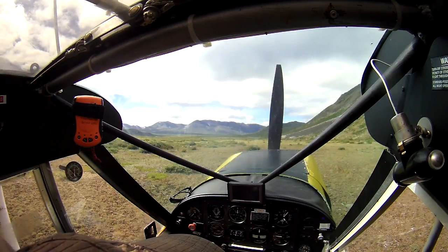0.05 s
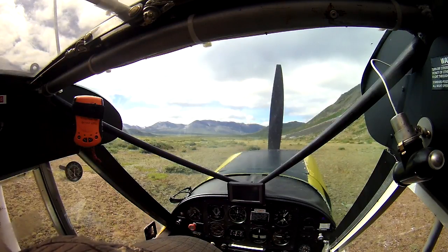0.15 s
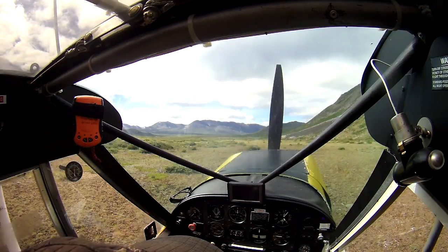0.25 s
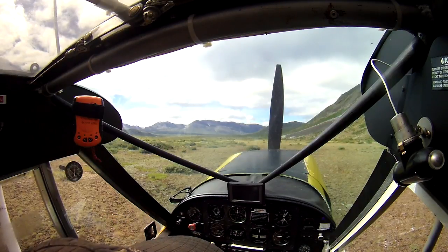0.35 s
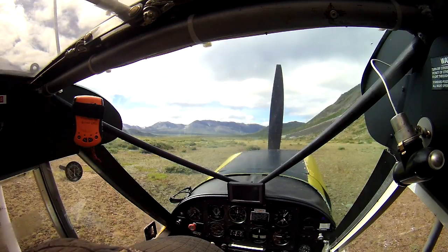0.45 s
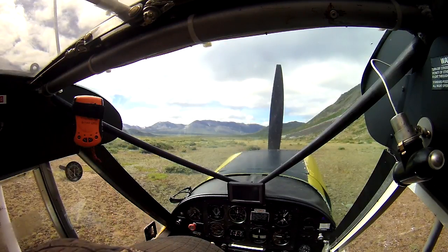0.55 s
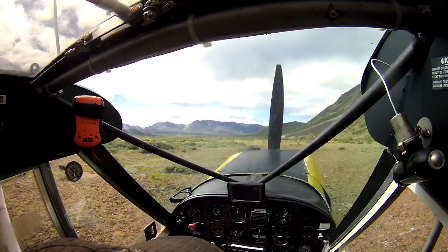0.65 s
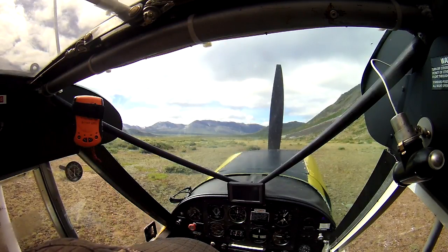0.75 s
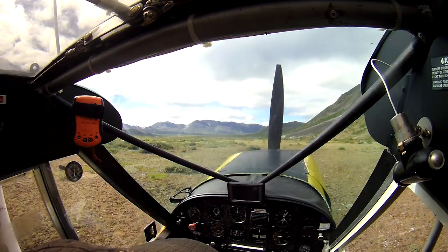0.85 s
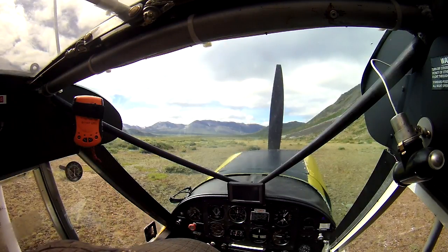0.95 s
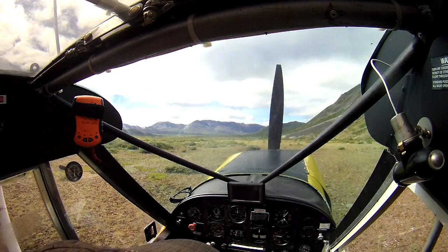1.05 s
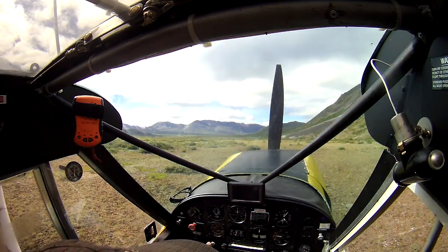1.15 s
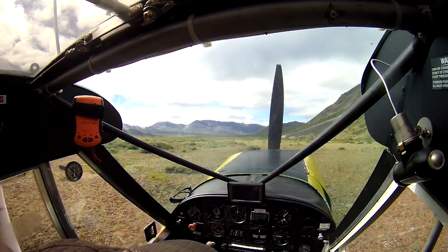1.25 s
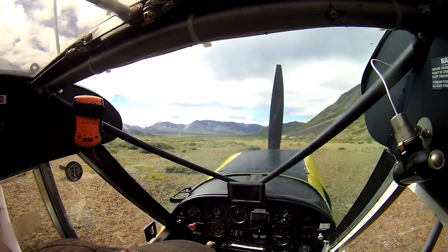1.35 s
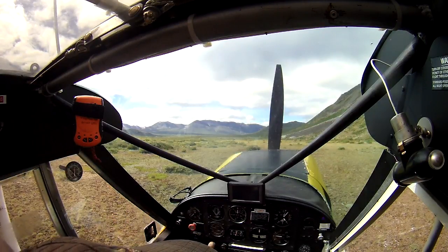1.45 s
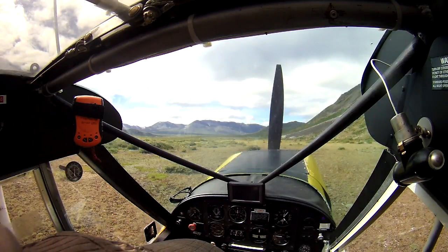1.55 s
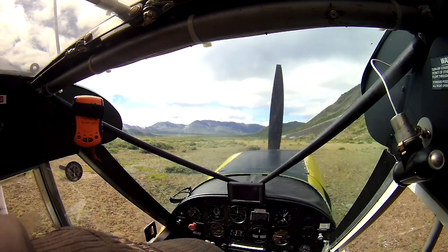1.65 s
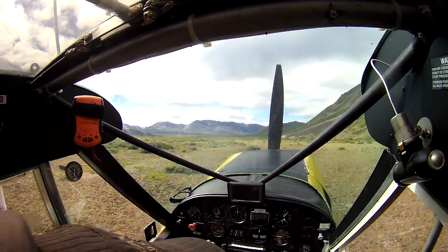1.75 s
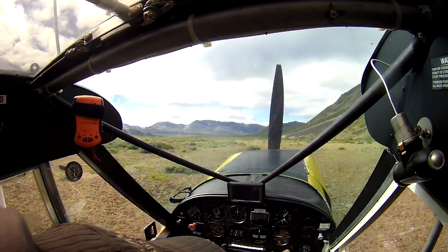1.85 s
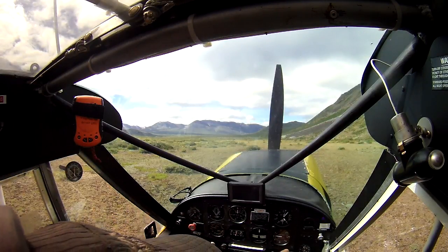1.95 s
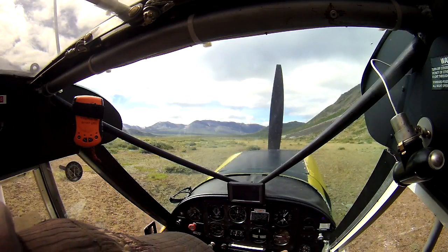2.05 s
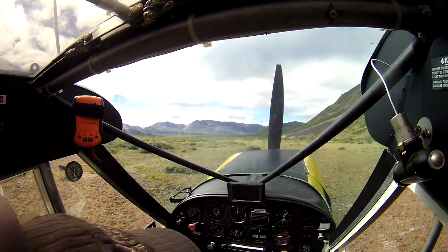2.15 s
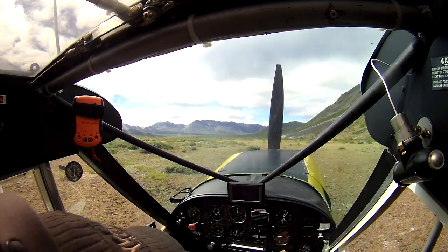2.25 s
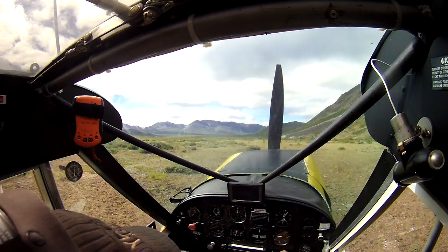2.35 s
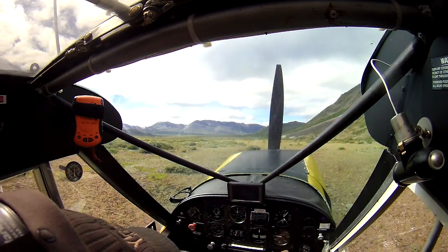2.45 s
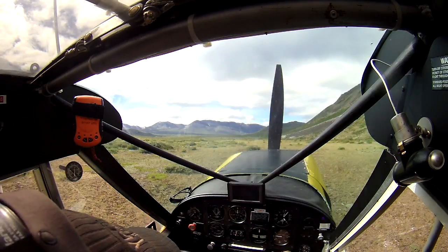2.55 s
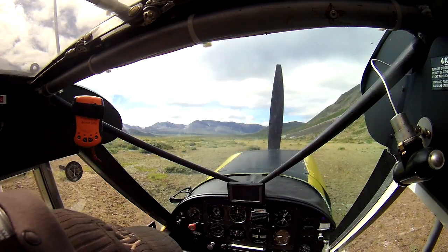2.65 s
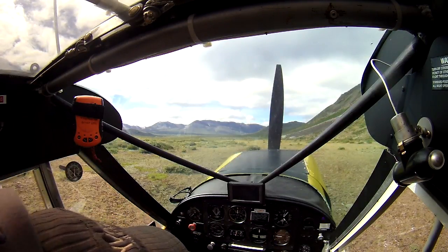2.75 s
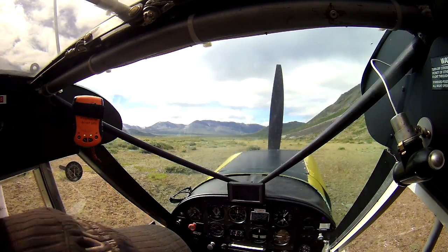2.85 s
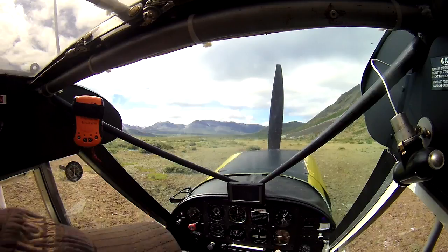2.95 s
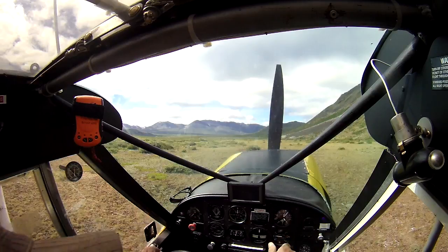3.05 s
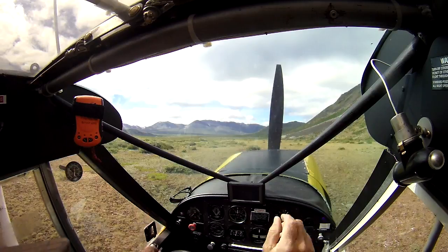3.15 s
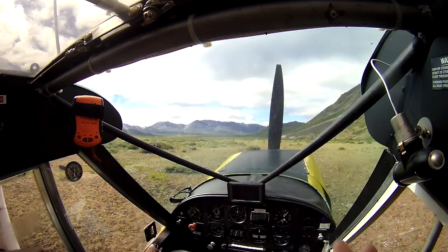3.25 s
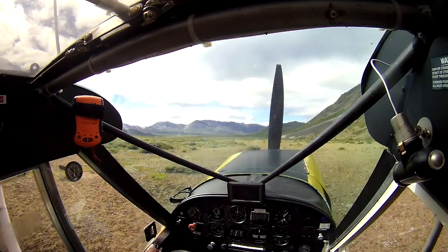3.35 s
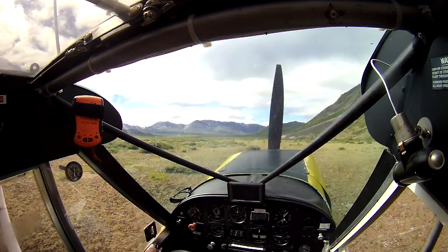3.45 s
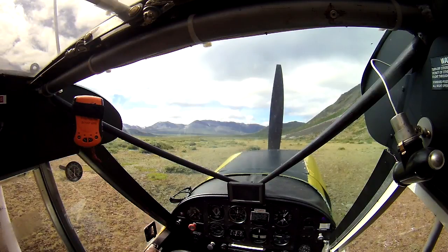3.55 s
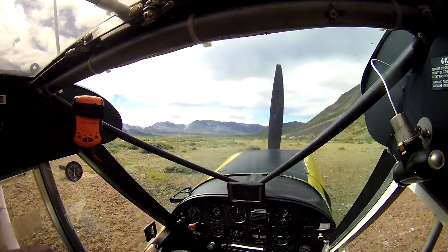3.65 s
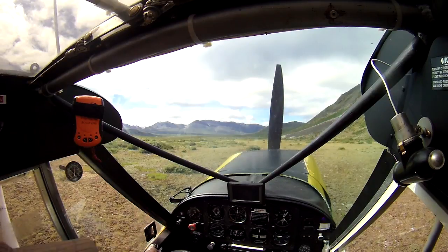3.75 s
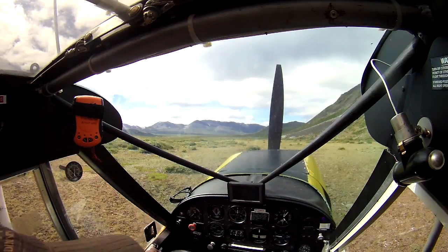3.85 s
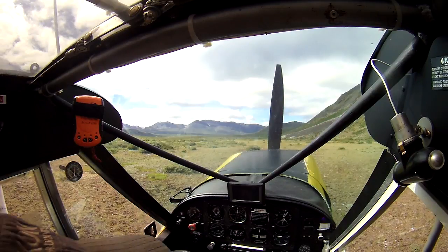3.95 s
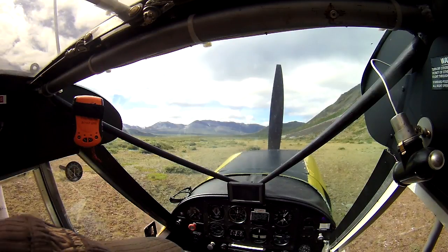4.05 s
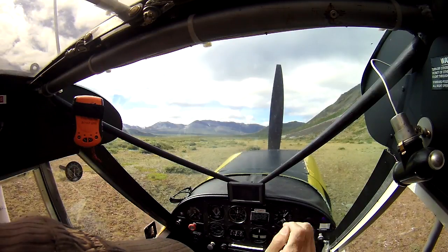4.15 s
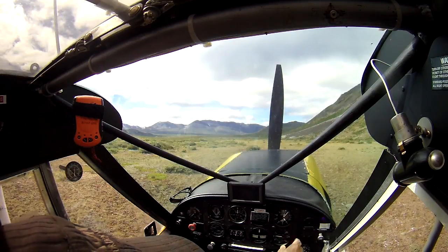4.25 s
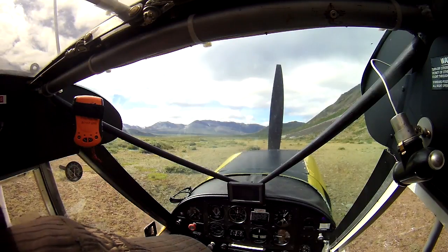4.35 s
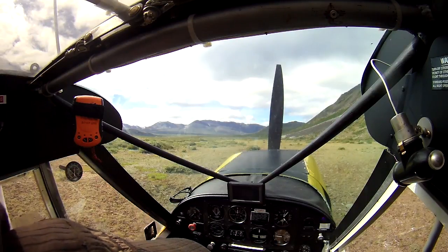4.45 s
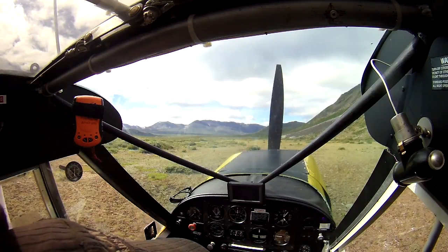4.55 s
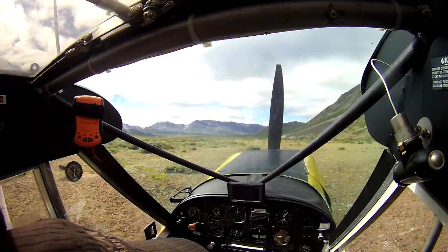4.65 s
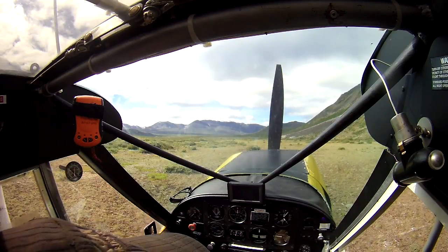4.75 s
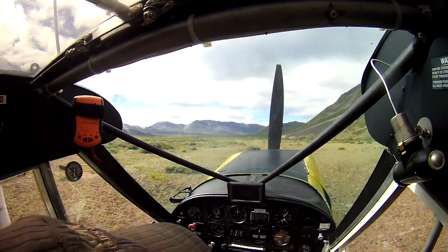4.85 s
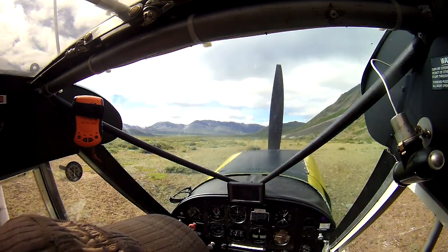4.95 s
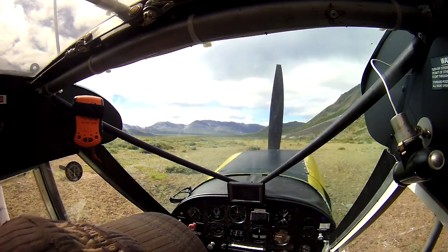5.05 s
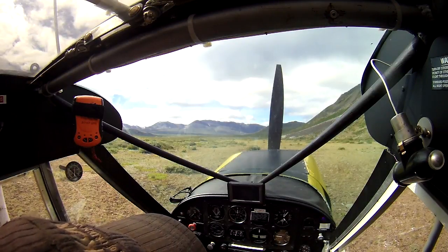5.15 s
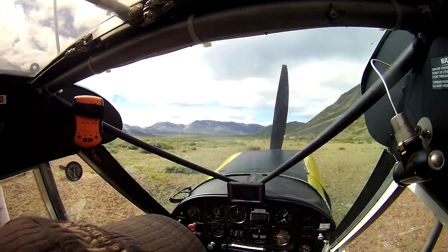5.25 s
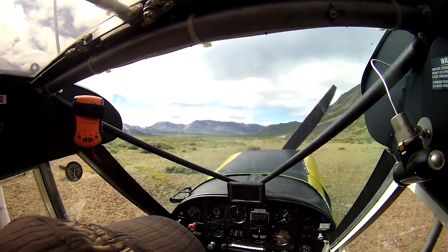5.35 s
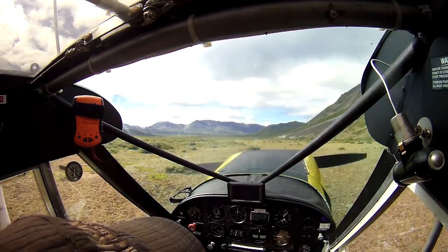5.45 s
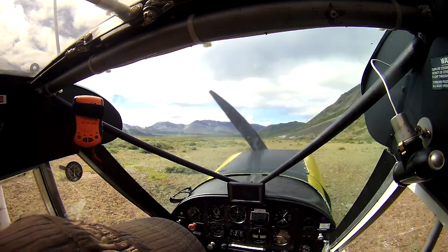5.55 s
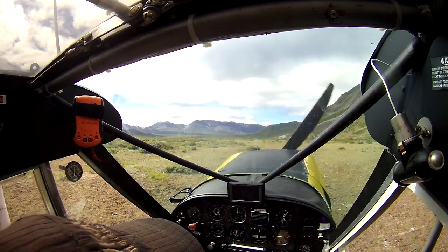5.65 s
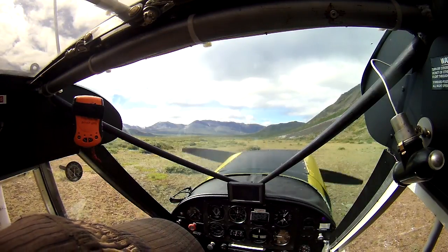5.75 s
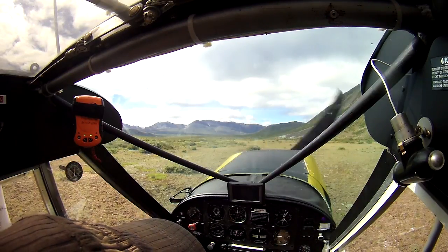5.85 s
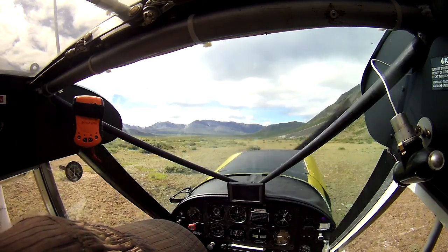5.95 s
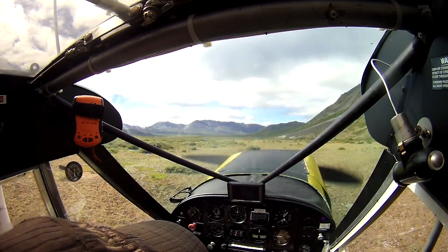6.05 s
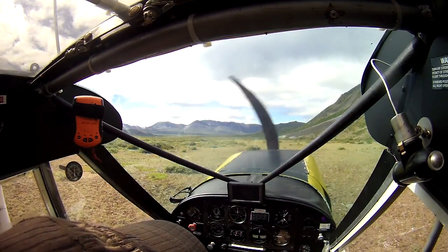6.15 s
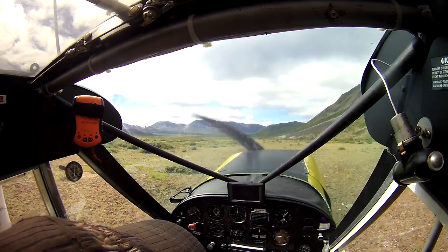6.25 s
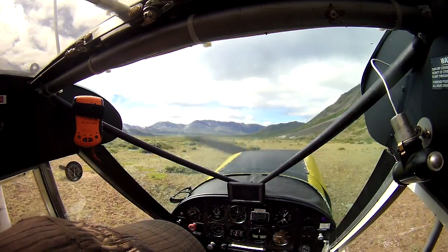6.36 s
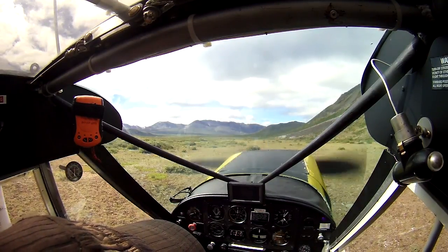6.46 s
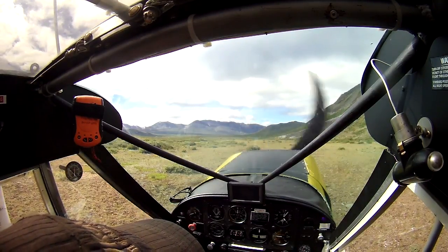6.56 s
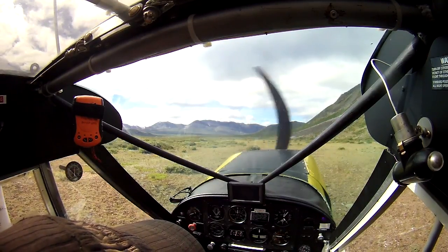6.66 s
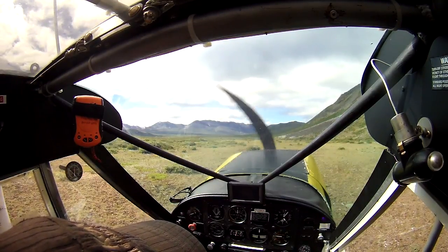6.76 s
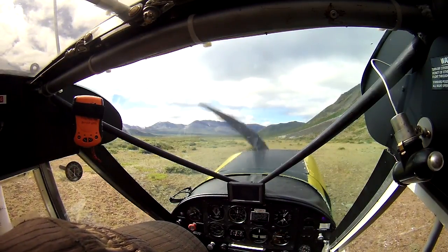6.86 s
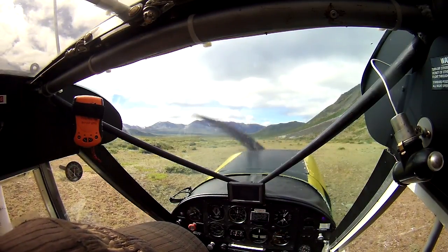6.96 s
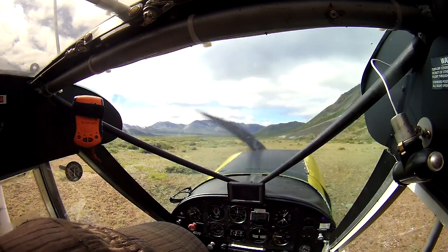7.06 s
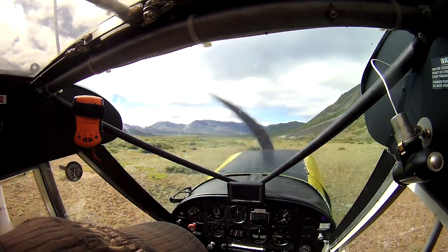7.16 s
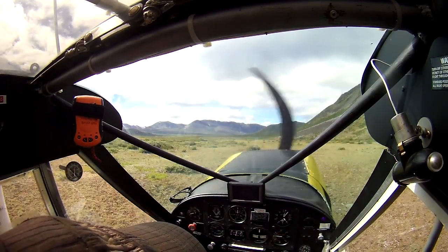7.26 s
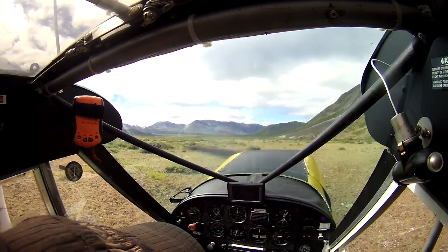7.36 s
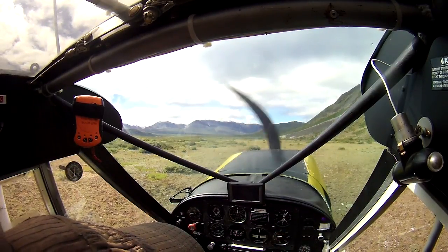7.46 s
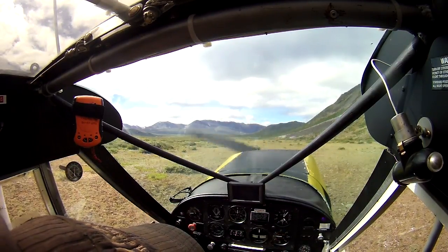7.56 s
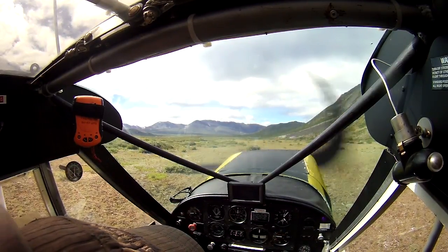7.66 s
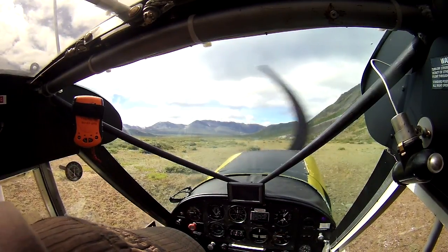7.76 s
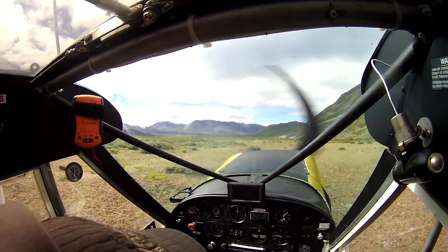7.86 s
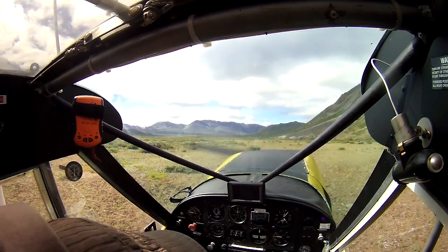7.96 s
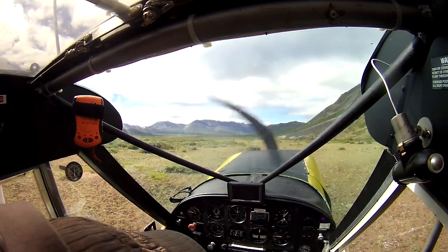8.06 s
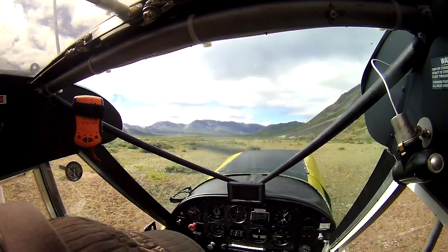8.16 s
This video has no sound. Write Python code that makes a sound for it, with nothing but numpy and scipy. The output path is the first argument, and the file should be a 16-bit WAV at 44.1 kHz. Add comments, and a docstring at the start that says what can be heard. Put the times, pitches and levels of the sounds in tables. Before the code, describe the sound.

Heard from between the seats of a small propeller plane, a quiet stretch holds faint breeze rumble, sliding cloth and scattered switch clicks. A firm click engages the starter, which grinds and whines for about half a second. The piston engine fires with hard gear knocks and a deep shudder, rattles unevenly at idle and then gains speed, ending with a short burst of exhaust cracks.

```python
"""In the cockpit of a parked light aircraft, a sleeve rustles and panel switches click over a faint
outdoor rumble. At 5.2 s the starter clunks in and whirrs, and the propeller gear knocks through its
slack. Near 5.8 s the four-cylinder engine catches, shakes the cabin and clatters at a lumpy idle.
From 7 s it picks up speed, with a short burst of sharp exhaust cracks just before the end."""
import sys
import numpy as np
from scipy import signal
from scipy.fft import rfft, irfft
from scipy.io import wavfile
from scipy.ndimage import uniform_filter1d

SR = 44100
rng = np.random.default_rng(int(sys.argv[2]) if len(sys.argv) > 2 else 0)


def int16_out(signal):
    """Quantize to a 16-bit WAV file."""
    q = np.round(np.clip(np.atleast_2d(signal).T, -1, 1) * 32767)
    wavfile.write(sys.argv[1], SR, q.astype(np.int16))


N = 361619
T = np.arange(N) / SR
STARTER_ON_S, KICK_S, RELEASE_S = 5.2, 5.25, 5.8  # the starter is switched on, meshes, is let go
LEAD_S = .015  # build-up ahead of a strike's peak

# crankshaft speed: time_s, turns_per_s
CRANK_SPEED = [(5.2, 0.0), (5.26, 2.56), (5.78, 2.56), (5.87, 16.92), (6.15, 14.85), (6.33, 18.63),
               (6.55, 18.55), (6.8, 17.91), (7.0, 19.66), (7.2, 20.87), (7.4, 24.33), (7.55, 24.77),
               (7.68, 27.15), (7.75, 24.2), (7.82, 29.0), (7.9, 30.29), (8.05, 34.75), (8.2, 32.74)]
# deep shudder of the cabin: freq_hz, level_db
SHAKE_SPECTRUM = [(8, -22), (18, 1.5), (33, 0), (45, 7), (55, -5.5), (70, -7.5), (100, -15.5), (150, -18.5),
                  (400, -100.5)]
# low drone of exhaust and starter: freq_hz, level_db
DRONE_SPECTRUM = [(50, -29), (100, -0.5), (130, 3), (165, 1), (205, -0.5), (260, -8), (325, -21.5),
                  (390, -12.5), (520, -37.5), (900, -79.5)]
# hard click of the panel: freq_hz, level_db
PANEL_SPECTRUM = [(200, -6.5), (400, -15.5), (520, -38), (680, -28), (900, -36), (1250, -12.5), (1500, -15),
                  (1900, -3), (2350, -5), (2680, -9.5), (3300, -15.5), (4100, -27.5), (8000, -48),
                  (15000, -59)]
# bright snap of a contact: freq_hz, level_db
SNAP_SPECTRUM = [(1500, -35), (3200, 12.5), (4200, -9), (5200, -6), (6200, -21.5), (7400, -8), (11000, -35),
                 (15000, -38.5)]


def undb(db):
    """Decibels to gain."""
    return 10 ** (np.asarray(db) / 20)


def curve(table, at=T):
    """Read a two-column table as a line, by default through time."""
    return np.interp(at, *np.transpose(table))


def noise():
    """White noise of unit power."""
    return rng.standard_normal(N)


def drift(rate_hz):
    """Smooth random wander with a spread near 1."""
    knots = np.arange(0, 10, 1 / rate_hz)
    return np.interp(T, knots, noise()[:len(knots)])


def bell(s, half_s):
    """A smooth rise and fall about time s."""
    return np.exp(-((T - s) / half_s) ** 2)


def burst(s, attack_s, release_s):
    """A smooth attack up to time s, then an exponential release."""
    return np.where(T < s, bell(s, attack_s), np.exp(-np.abs(T - s) / release_s))


def colour(x, spectrum, size=16384):
    """Play x through a body with the given spectrum, as a minimum-phase filter."""
    hz, db = np.transpose(spectrum)
    bins = np.arange(size // 2 + 1) * SR / size
    gain = undb(np.interp(np.log(bins + 1), np.log(hz), db))
    cepstrum = irfft(np.log(gain))
    cepstrum[1:size // 2] *= 2
    cepstrum[size // 2 + 1:] = 0
    return signal.fftconvolve(x, irfft(np.exp(rfft(cepstrum))))[:len(x)]


def steady(x, size=6000):
    """Ride the level to unit power over a few engine turns; single beats keep their shape."""
    power = uniform_filter1d(uniform_filter1d(x ** 2, size), size)
    return x / np.sqrt(np.abs(power) + np.mean(x ** 2) / 10 ** 4)


def texture(x, spectrum):
    """Colour x and hold it at unit power."""
    return steady(colour(x, spectrum))


def ring(hz, t60_s):
    """One second of a fading mode."""
    t = T[:SR]
    return np.sin(2 * np.pi * hz * t) * undb(-60 * t / t60_s)


def strike(spectrum, rise_s, fall_s, tail_db, tail_s, size=8192):
    """A chatter of contacts builds for LEAD_S, rings a body to a peak near 1 and dies away."""
    t = T[:size] - LEAD_S
    after = np.maximum(t, 0)
    attack = np.exp(np.minimum(t, 0) / rise_s)
    decay = np.exp(-after / fall_s) + undb(tail_db) * np.exp(-after / tail_s)
    hit = colour(attack * decay * rng.standard_normal(size), spectrum)
    return hit / np.sqrt(2 * uniform_filter1d(hit ** 2, size=128).max())


def add(out, s, sound):
    """Mix a sound in at time s."""
    i = max(int(s * SR), 0)
    out[i:i + len(sound)] += sound[:N - i]


def doublings(speed, idle_turns_per_s=18):
    """Octaves of crank speed above idle, with a floor just below it."""
    return np.log2(np.maximum(speed / idle_turns_per_s, .8))


def ambience():
    """Breeze rumbles outside, and the cabin's air hums along in one faint swell."""
    # outdoor rumble: freq_hz, level_db
    outdoors = [(8.8, -20), (15, 6.5), (34, 1.5), (86, -7), (130, -6.5), (160, -15.5), (196, -12),
                (259, -19.5), (391, -24.5), (565, -29), (1230, -39), (1380, -57.5), (3630, -77),
                (4720, -74.5), (7990, -120)]
    # air resonance of the cabin: freq_hz, level_db
    cabin_air = [(120, -56.5), (185, -20.5), (198, 1.5), (212, -13), (320, -50.5), (900, -89.5)]
    rumble = colour(noise(), outdoors)
    hum = texture(noise(), cabin_air) * burst(3.203, attack_s=.3, release_s=.45)
    return undb(-58) * rumble / np.std(rumble) + undb(-60.5) * hum


def sleeve():
    """Cloth slides as the arm moves: soft strokes over a constant whisper."""
    # arm strokes: centre_s, half_length_s, level_db
    strokes = [(1.654, 0.24, -84), (2.105, 0.089, -73.5), (2.67, 0.18, -89), (3.29, 0.16, -79),
               (3.563, 0.041, -75), (4.162, 0.15, -77)]
    # sliding cloth: freq_hz, level_db
    cloth = [(300, -9.5), (900, -11.5), (1250, 0.5), (1500, -2.5), (1950, 0.5), (3200, -3.5), (4000, -13),
             (5200, -14.5), (7000, -23), (14000, -53.5)]
    sliding = undb(-83.5) + sum(undb(db) * bell(s, half_s) for s, half_s, db in strokes)
    return sliding * texture(noise() * undb(2 * drift(100)), cloth)


def cabin_ticks(ticks_per_s=4, level_db=-73, scatter_db=4):
    """Small things shift and tick faintly until the starter comes in."""
    out = np.zeros(N)
    for _ in range(int(ticks_per_s * STARTER_ON_S)):
        s, db = rng.uniform(0, STARTER_ON_S), rng.normal(level_db, scatter_db)
        add(out, s, undb(db) * strike(PANEL_SPECTRUM, rise_s=.003, fall_s=.012, tail_db=-16, tail_s=.02))
    return out


def airframe():
    """Firm pushes and the starter's kick ring the frame, which sways on with a deep note."""
    # blows to the frame: start_s, level_db, relative_sway_db
    thumps = [(1.285, -56.5, -16), (1.479, -55, -6), (2.396, -47.5, -7), (2.567, -57.5, 3),
              (3.76, -50.5, 3), (5.241, -32, 6)]
    # frame modes: pitch_hz, level_db, t60_s
    modes = [(76.4, -3.5, 0.75), (136.8, -6, 0.45), (207.5, -1.5, 0.45), (397, -21, 0.53), (656, -7, 0.1),
             (1070, -22, 0.13), (1210, -9, 0.15)]
    body = sum(undb(db) * ring(hz, t60_s) for hz, db, t60_s in modes)
    sway = undb(-1) * ring(54, t60_s=1.3)
    out = np.zeros(N)
    for s, db, sway_db in thumps:
        add(out, s, undb(db) * (body + undb(sway_db) * sway))
    return out


def switches():
    """Each lever scrapes over its detent, snaps and rings; the last click is the starter's."""
    # switches and keys, levels ahead of the mix trims: time_s, level_db, ring_hz, thud_db, snap_db
    flicks = [(0.204, -60, 1950, -2, 2), (0.271, -62, 1830, 13.5, 8), (1.055, -66, 1190, 7, 3),
              (1.235, -57.5, 2370, 23.5, -2), (1.288, -50, 2280, 20, 6), (1.337, -61.5, 3030, -1, 22),
              (1.478, -55, 1250, 14, -4), (2.395, -39.5, 2390, 6, 18), (2.564, -44.5, 2370, 5, 18),
              (2.885, -51, 2300, 10, -16), (3.589, -58.5, 2040, 12, -6), (3.696, -60.5, 2160, 11, -4),
              (3.7596, -24, 2010, -1.5, 9.5), (3.896, -56.5, 2130, 15.5, -3), (4.362, -52, 2320, 0, -12),
              (4.478, -63.5, 2340, 2, -4), (4.503, -63.5, 2320, 0, -4), (4.529, -65, 2300, 5, -7),
              (5.02, -57, 2035, 1, 9), (5.2, -27, 1880, 0.5, -5.5)]
    # dull body of the panel: freq_hz, level_db
    panel_body = [(80, -5), (200, 5), (300, -3.5), (400, 7.5), (540, -19), (690, 0.5), (900, -17.5),
                  (1220, -2.5), (1700, -18.5), (4000, -68)]
    out = np.zeros(N)
    for s, db, hz, thud_db, snap_db in flicks:
        click = strike(PANEL_SPECTRUM, rise_s=.0027, fall_s=.009, tail_db=-16, tail_s=.021)
        thud = strike(panel_body, rise_s=.003, fall_s=.021, tail_db=-1, tail_s=.036)
        snap = strike(SNAP_SPECTRUM, rise_s=.0034, fall_s=.0061, tail_db=-5, tail_s=.016)
        contact = click + undb(thud_db - 15.5) * thud + undb(snap_db - 21.5) * snap
        lever = ring(hz, t60_s=.041) + undb(-12) * ring(1.43 * hz, t60_s=.062)
        add(out, s - LEAD_S, undb(db - 5) * contact)
        add(out, s, undb(db - 2) * lever)
    return out


def starter(run_out_s=.11):
    """The pinion grinds in; the armature hums, slowed by compression, and the gear teeth sing."""
    # armature speed: time_s, pitch_hz
    armature = [(5.2, 49.9), (5.26, 84.04), (5.33, 118), (5.4, 134), (5.52, 149.5), (5.58, 196.8),
                (5.65, 231.5), (5.78, 174.3), (5.85, 159.2), (6.05, 201.3)]
    # how loudly the airframe carries the hum: pitch_hz, level_db
    mount = [(50, -45), (84, -24), (116, -47.5), (138, -28.5), (153, -38), (174, -38.5), (197, -41.5),
             (232, -49)]
    # gear housing: freq_hz, level_db
    housing = [(400, -26.5), (720, -12), (900, -23.5), (1280, -6.5), (1500, -25.5), (2100, -17),
               (2330, 8.5), (2600, -14.5), (2950, -10.5), (3800, -37)]
    hz = curve(armature)
    mesh = undb(-35) * burst(STARTER_ON_S, attack_s=.004, release_s=.016)
    mesh += undb(-44.5) * burst(KICK_S, attack_s=.008, release_s=.032)
    grind = texture(noise(), PANEL_SPECTRUM) + undb(-25) * texture(noise(), SNAP_SPECTRUM)
    angle = 2 * np.pi * np.cumsum(hz * (1 + .019 * drift(90))) / SR
    hum = (np.sin(angle) + undb(-20.5) * np.sin(2 * angle)) * undb(curve(mount, hz) + 1.1 * drift(48))
    teeth = sum(np.sin(k * (angle + k)) for k in range(3, 18))
    whine_db = -47 + 8 * np.log2(hz / 190)  # louder the faster it runs
    whine = undb(whine_db) * texture(teeth * undb(2 * drift(200)), housing)
    # the growl is strongest while the motor drags the crank up to speed
    pull_in_s = KICK_S - STARTER_ON_S
    drag = undb(-31) * burst(KICK_S, pull_in_s, release_s=.3)
    growl = undb(-44) * texture(noise(), DRONE_SPECTRUM) + drag * texture(noise(), SHAKE_SPECTRUM)
    engaged = np.clip((T - STARTER_ON_S) / pull_in_s, 0, 1)
    run_out = np.exp(-np.maximum(T - RELEASE_S, 0) / run_out_s)
    return engaged * run_out * (hum + whine + growl) + mesh * grind


def knocks(knock_phase=.52, jitter_turns=.05):
    """Gear slack knocks and the cowling buzzes: a few times hard, and lightly on every running turn."""
    # propeller gear taking up its slack: time_s, untrimmed_level_db
    hard_knocks = [(5.2474, -29.5), (5.5148, -22.5), (5.7873, -21.5), (5.9293, -22), (6.0629, -23),
                   (6.0805, -22), (6.154, -29), (6.2954, -21.5), (6.3079, -21.5), (6.5991, -32),
                   (7.1963, -29), (7.33, -30), (7.694, -24)]
    # loud cowling buzzes: time_s, untrimmed_level_db
    loud_buzzes = [(6.2244, -37.5), (7.3488, -41.5), (7.7344, -41), (8.1094, -34)]
    # gear casing: freq_hz, level_db
    gear = [(300, -26.5), (700, -16.5), (900, -28), (1250, -11), (1500, -23), (1950, -7.5), (2290, 6.5),
            (2650, -16), (3300, -16.5), (3900, -42.5), (5000, -48), (8000, -62), (15000, -76)]
    # cowling sheet: freq_hz, level_db
    cowling = [(400, -35.5), (700, -14.5), (900, -33.5), (1220, 3), (1500, -15), (4000, -62.5)]
    speed = curve(CRANK_SPEED)
    turns = np.cumsum(speed) / SR
    gear_hits = [(s, db - 2.5) for s, db in hard_knocks]
    cowling_hits = [(s, db + 3.5) for s, db in loud_buzzes]
    for turn in np.arange(np.ceil(np.interp(RELEASE_S, T, turns)), np.floor(turns[-1])):
        timing, force, looseness, lag = rng.standard_normal(4)
        s = np.interp(turn + knock_phase + jitter_turns * timing, turns, T)
        gear_hits.append((s, -38 + 1.3 * force))
        # the buzz trails the knock and grows with speed
        rate = np.interp(s, T, speed)
        buzz_s = min(s + abs(lag) / rate / 2, T[-1])
        cowling_hits.append((buzz_s, -50 + 7.5 * doublings(rate) + 5 * looseness))
    out = np.zeros(N)
    for s, db in gear_hits:
        knock = strike(gear, rise_s=.0015, fall_s=.0051, tail_db=-18.5, tail_s=.004)
        add(out, s - LEAD_S, undb(db) * knock)
    for s, db in cowling_hits:
        buzz = strike(cowling, rise_s=.0016, fall_s=.0045, tail_db=-12.5, tail_s=.021)
        add(out, s - LEAD_S, undb(db) * buzz)
    return out


def beats(turns, scatter_db):
    """One impulse at each whole turn, each of its own strength."""
    return np.diff(np.floor(turns), prepend=np.floor(turns[0])) * undb(scatter_db * noise())


def firings(turns, weak_db, scatter_db=2.2, jitter_turns=.025):
    """The cold engine fires twice a turn, strong then weak, each a little early or late."""
    uneven = np.maximum.accumulate(turns + jitter_turns * drift(25))
    return beats(uneven, scatter_db) + undb(weak_db) * beats(uneven + .5, scatter_db)


def effort(speed):
    """Gains of the engine's layers: speed and surges move them, and only bursts open the cracks."""
    # the cold engine surges and stumbles: centre_s, half_length_s, shake_db, drone_db, clatter_db
    surges = [(5.891, 0.049, 1, -3, 2), (6.047, 0.11, -4.5, 8.5, 7.5), (6.244, 0.16, 7.5, 11, 4.5),
              (6.7, 0.041, -4, -3.5, -3), (7.124, 0.18, 3.5, 3, 2)]
    # bursts of hard firing: peak_s, attack_s, release_s, crack_db, hiss_db, drone_db
    hard_firing = [(6.245, 0.014, 0.015, -48.5, -54, -50), (7.51, .025, .04, -68, -69.5, -44),
                   (7.88, 0.1, 0.11, -43.5, -64.5, -32)]
    octaves = doublings(speed)
    # dB at idle, plus dB per octave of speed
    shake, drone = undb(-27.5 + 8 * octaves), undb(-47 + 15.5 * octaves)
    clatter, hiss = undb(-47.5 + 7.5 * octaves), undb(-75 + 9.5 * octaves)
    crack = np.zeros(N)
    for s, half_s, shake_db, drone_db, clatter_db in surges:
        surge = bell(s, half_s)
        shake *= undb(shake_db * surge)
        drone *= undb(drone_db * surge)
        clatter *= undb(clatter_db * surge)
        hiss *= undb(clatter_db * surge)
    for s, attack_s, release_s, crack_db, hiss_db, drone_db in hard_firing:
        load = burst(s, attack_s, release_s)
        crack += undb(crack_db) * load
        hiss += undb(hiss_db) * load
        drone += undb(drone_db) * load
    return shake, drone, clatter, hiss, crack


def exhaust_cracks(turns):
    """Under load each exhaust pulse has a sharp front and a puff of gas behind it."""
    # front of a pulse: freq_hz, level_db
    pulse_front = [(400, -20), (1300, -8), (2200, -5), (2850, 0), (3400, -6), (4100, -20), (5000, -11),
                   (6200, -27), (7500, -34), (10000, -55)]
    # exhaust gas through the cabin wall: freq_hz, level_db
    gas = [(300, -11.5), (420, -5), (540, -3.5), (700, 5), (850, -4.5), (1250, -3), (1480, -1), (1800, 0),
           (2800, 1), (3400, -17.5), (4100, -34), (5000, -31), (9000, -61.5)]
    turns_since = turns % .5
    front = beats(2 * turns, scatter_db=1.5) + undb(-20) * noise() * np.exp(-turns_since / .03)
    puff = noise() * (np.exp(-turns_since / .2) + undb(-11.5))
    return undb(-7) * texture(front, pulse_front) + undb(6) * texture(puff, gas)


def combustion(speed, turns, shake_gain, drone_gain, crack_gain, lumpy_db=1.5):
    """Firings rock the cabin and drone in the exhaust; propeller wash buffets along."""
    pushes = firings(turns + .005 * speed, weak_db=-10)  # 5 ms ahead of the exhaust
    wash = undb(-9) * texture(noise(), SHAKE_SPECTRUM)
    shake = steady(texture(-pushes, SHAKE_SPECTRUM) + wash)
    pulses = firings(turns, weak_db=-3)
    drone = texture(pulses, DRONE_SPECTRUM) + undb(-5) * texture(noise(), DRONE_SPECTRUM)
    cracks = exhaust_cracks(turns)
    return shake * shake_gain + drone * drone_gain * undb(lumpy_db * drift(14)) + cracks * crack_gain


def engine(spin_up_s=.19, throb_db=2.5, grains_per_s=450, ticks_per_s=1500):
    """The crank turns over, then catches; gears and tappets clatter in step with it."""
    # engine casing: freq_hz, level_db
    casing = [(290, -41.5), (500, -18), (557, -19), (703, -4.5), (850, -23.5), (947, -12.5), (1110, -20.5),
              (1230, 2), (1470, -23), (1710, -7), (2080, -10.5), (2280, 3), (2690, -21), (3340, -15.5),
              (3630, -30), (4720, -50.5), (7990, -120)]
    # valve gear: freq_hz, level_db
    valve_gear = [(1500, -23), (2300, 28.5), (2650, 6.5), (3300, -4.5), (4000, -28), (5000, -33.5),
                  (9000, -47)]
    # hiss on top of the clatter: freq_hz, level_db
    sizzle = [(2500, 15), (3300, -20.5), (4100, 0), (4900, 14), (6000, -1), (7200, 2), (9000, -9.5),
              (15000, -40)]
    speed = curve(CRANK_SPEED)
    turns = np.cumsum(speed) / SR
    shake_gain, drone_gain, clatter_gain, hiss_gain, crack_gain = effort(speed)
    caught = np.interp(T, [5.78, 5.86], [0, 1])
    cranking = np.clip((T - STARTER_ON_S) / spin_up_s, 0, 1) ** 2 * (1 - caught)
    # loose parts chatter most once a turn, just after the weaker firing
    throb = undb(throb_db * caught * np.cos(2 * np.pi * (turns - .65)))
    grains = (rng.random(N) < grains_per_s / SR) * noise()
    clatter = undb(-1) * texture(throb * (steady(grains) + undb(1) * noise()), casing)
    # the valve gear rattles in one ragged bunch of ticks a turn
    bunch = np.exp(2 * np.cos(2 * np.pi * (turns - .6)))
    ticks = (rng.random(N) < ticks_per_s / SR) * noise() * bunch
    tappets = undb(-7) * texture(ticks, valve_gear)
    hiss = texture(throb * noise() * undb(2 * drift(90)), sizzle)
    running = combustion(speed, turns, shake_gain, drone_gain, crack_gain)
    running += (clatter + tappets) * clatter_gain + hiss * hiss_gain
    turning_over = undb(-48.5) * clatter + undb(-78.5) * hiss
    return caught * running + cranking * turning_over


def scene():
    """Everything as it meets between the seats, in mono."""
    machinery = engine() + starter() + knocks()
    cockpit = switches() + airframe() + ambience() + sleeve() + cabin_ticks()
    return (machinery + cockpit)[None]


def record(dry):
    """A faint hiss lies under the mix, and the very top is cut steeply."""
    hiss_db, top_hz = -82.5, 15700
    lowpass = signal.ellip(8, .2, 70, top_hz, fs=SR, output="sos")
    return signal.sosfilt(lowpass, dry + undb(hiss_db) * noise())


dry = scene()
out = record(dry)
int16_out(out)
```